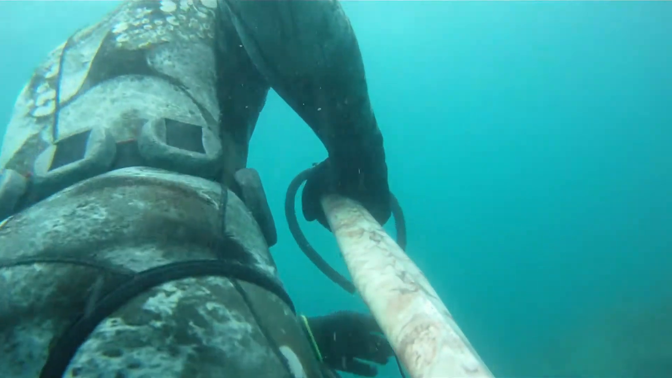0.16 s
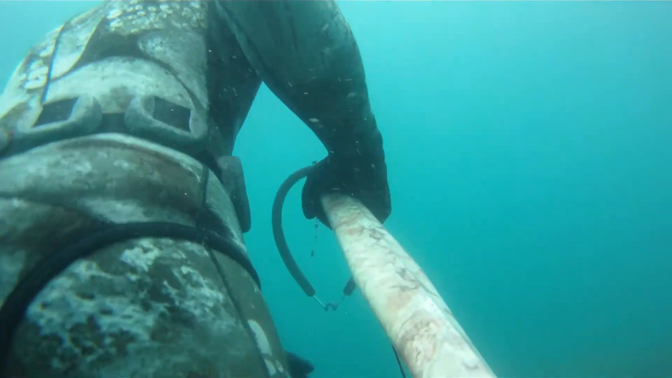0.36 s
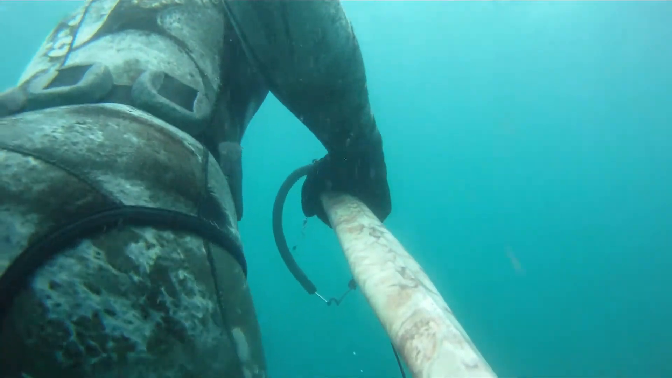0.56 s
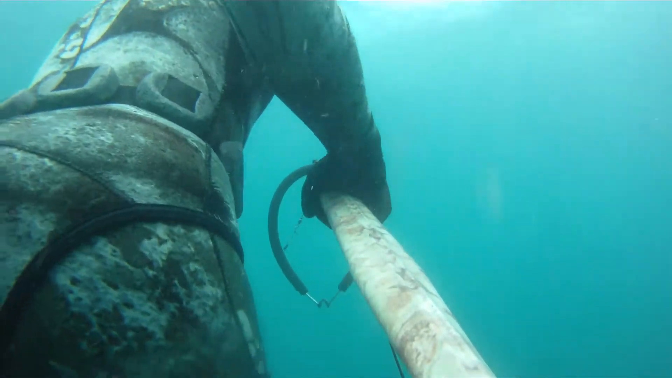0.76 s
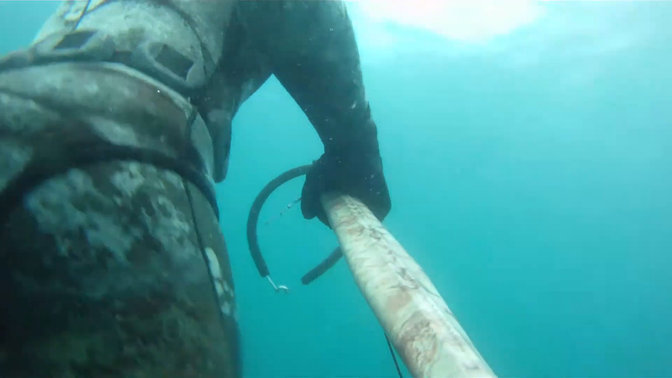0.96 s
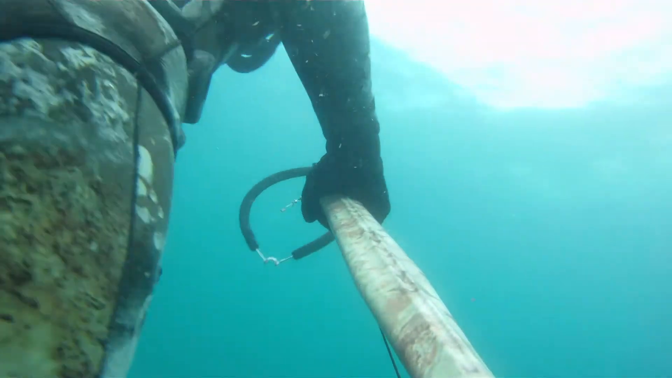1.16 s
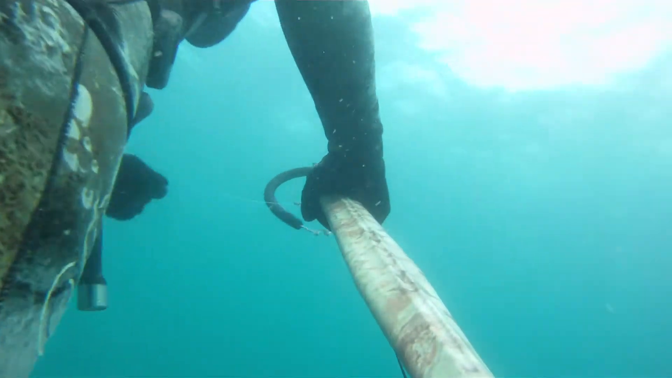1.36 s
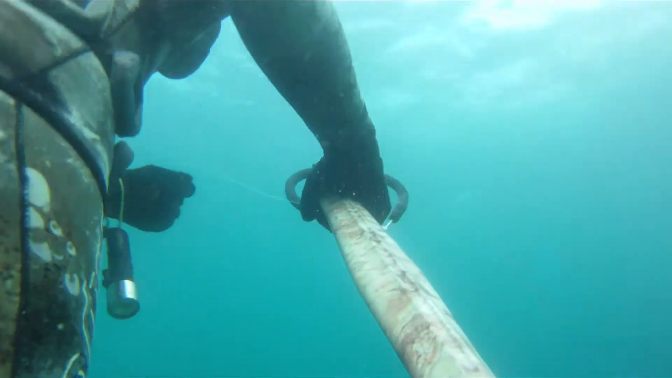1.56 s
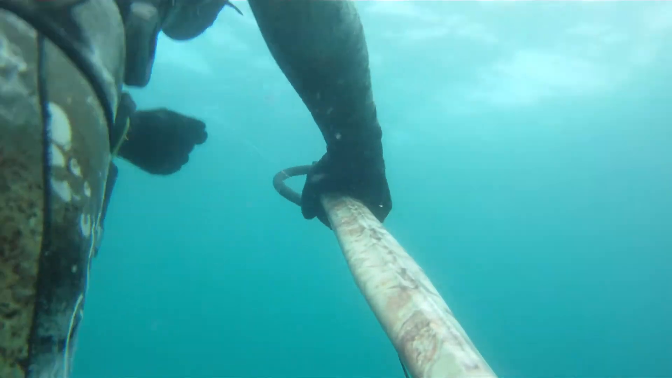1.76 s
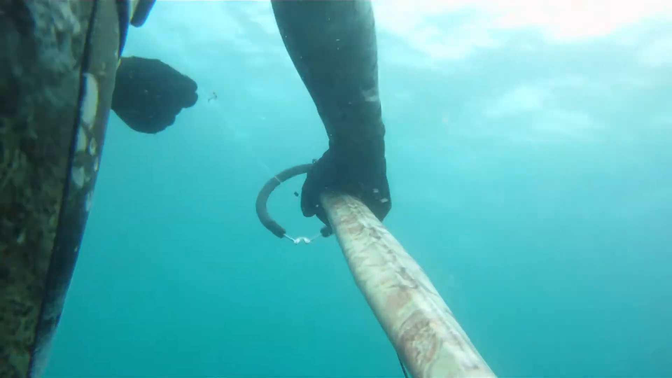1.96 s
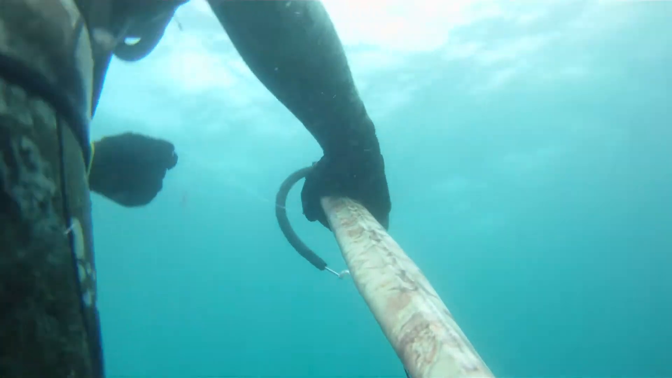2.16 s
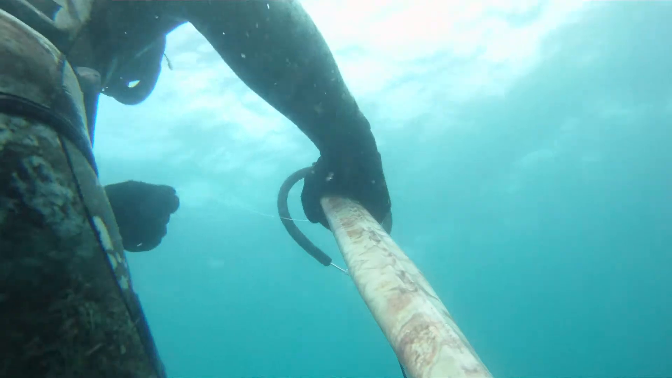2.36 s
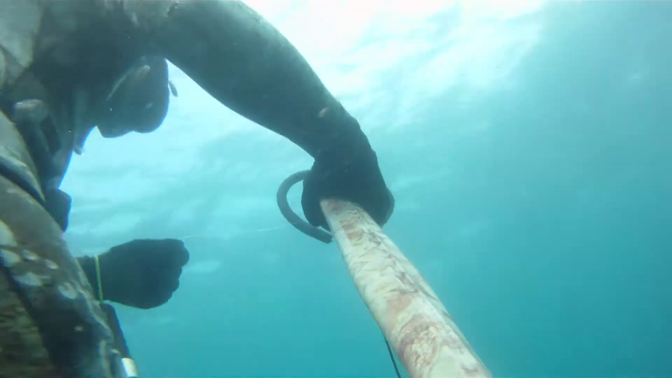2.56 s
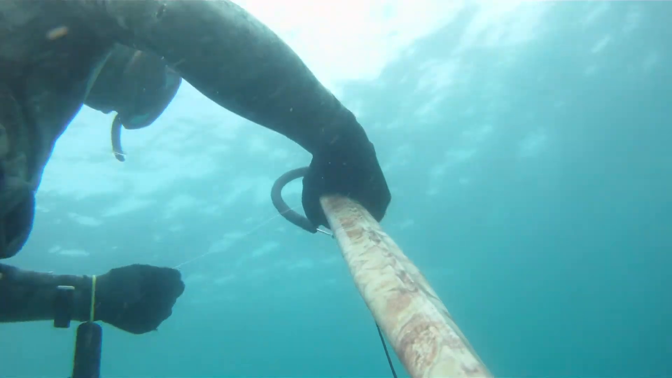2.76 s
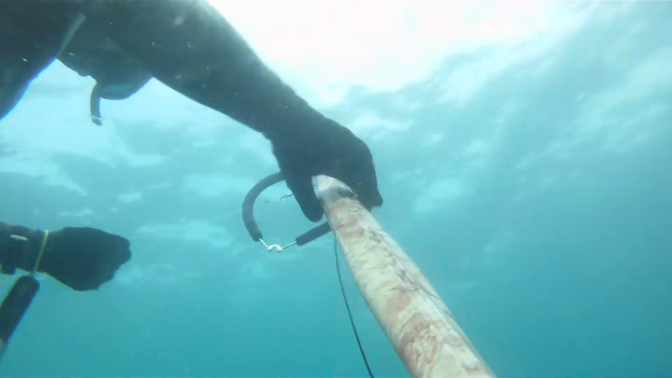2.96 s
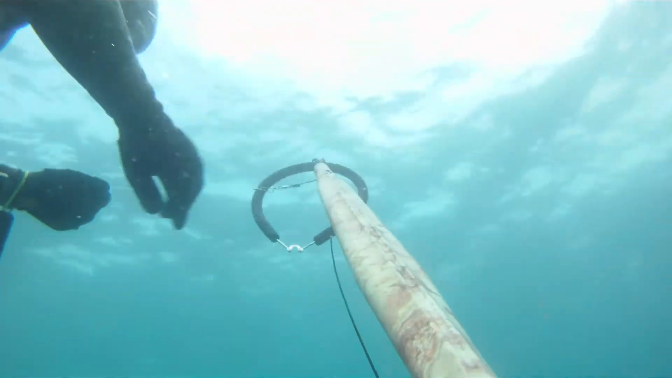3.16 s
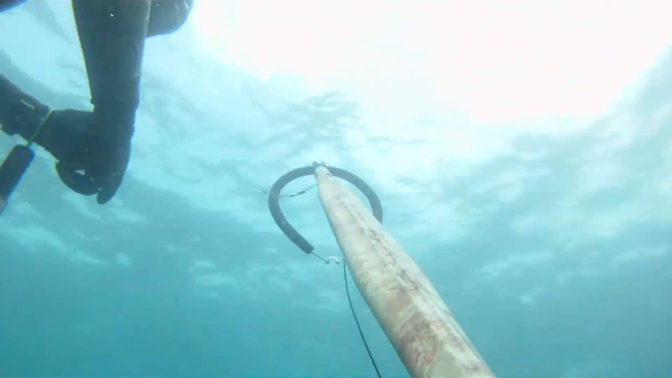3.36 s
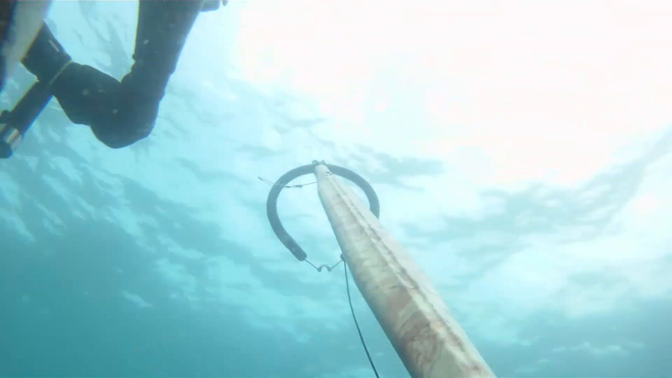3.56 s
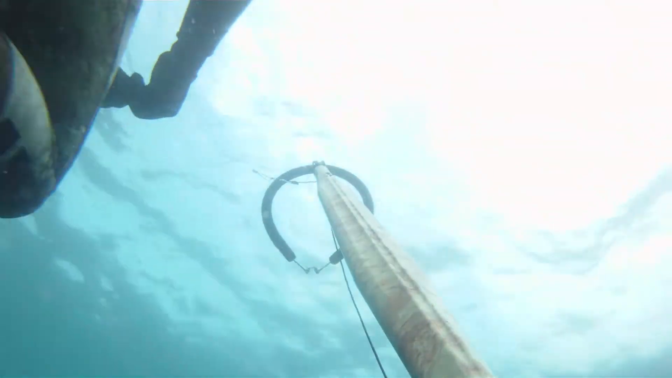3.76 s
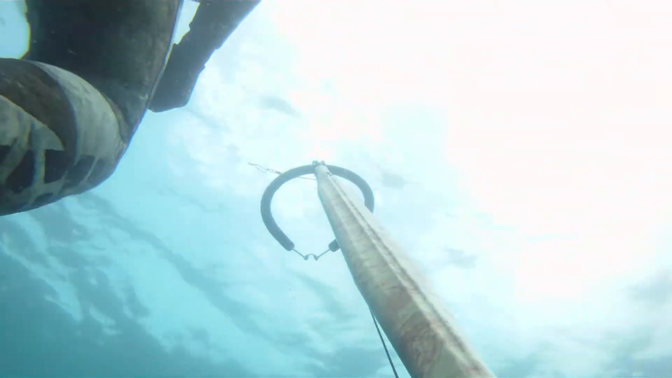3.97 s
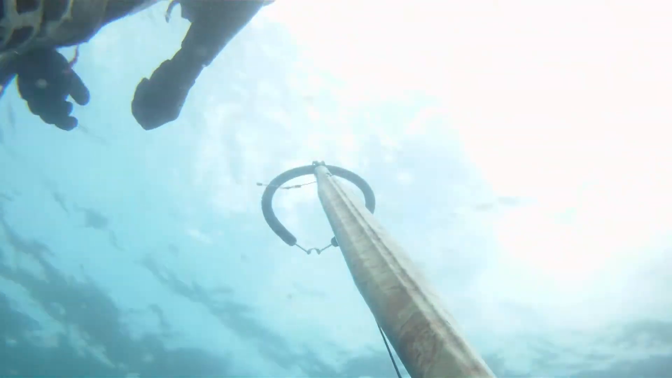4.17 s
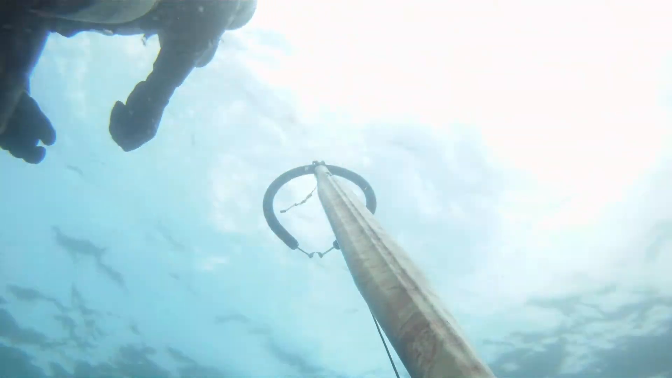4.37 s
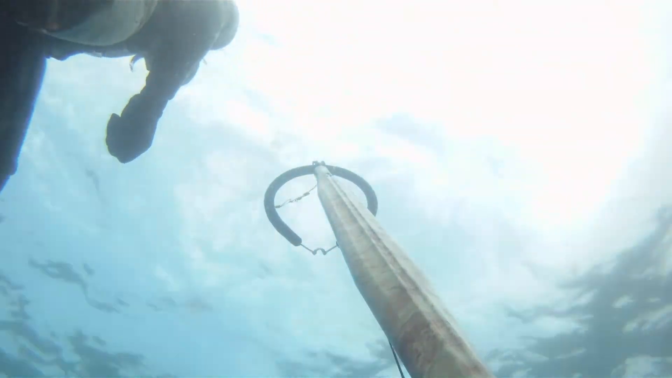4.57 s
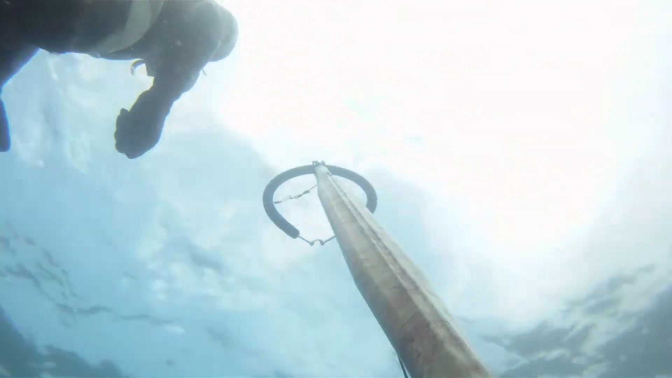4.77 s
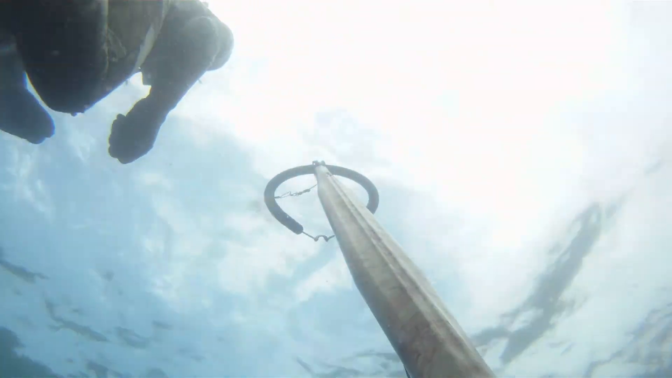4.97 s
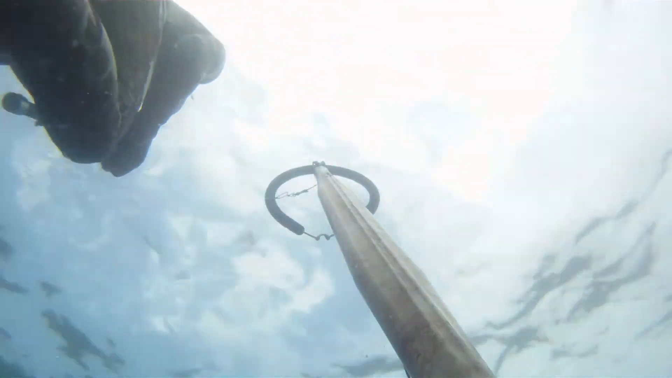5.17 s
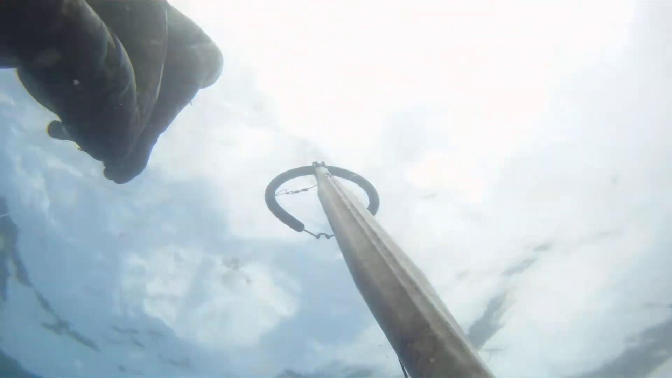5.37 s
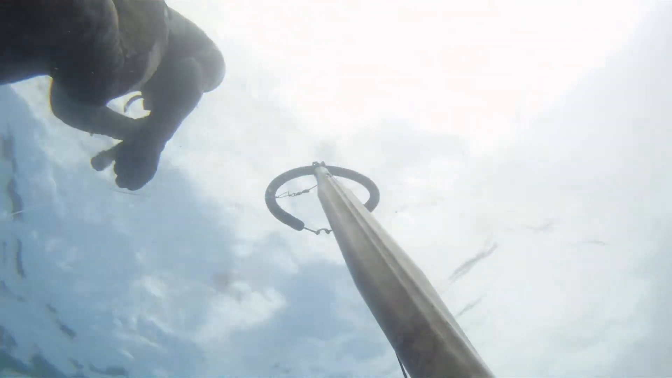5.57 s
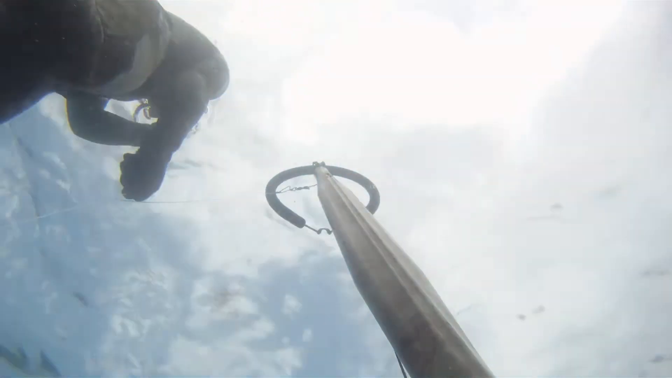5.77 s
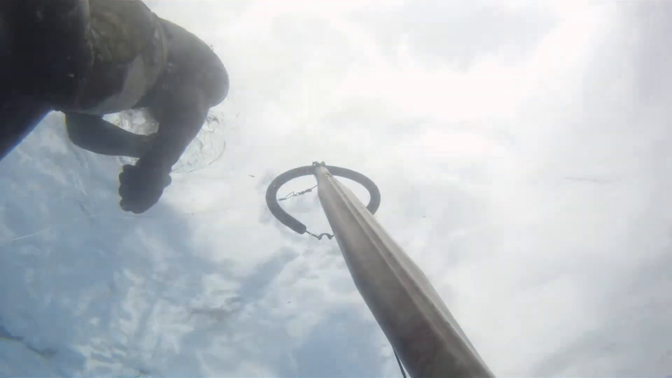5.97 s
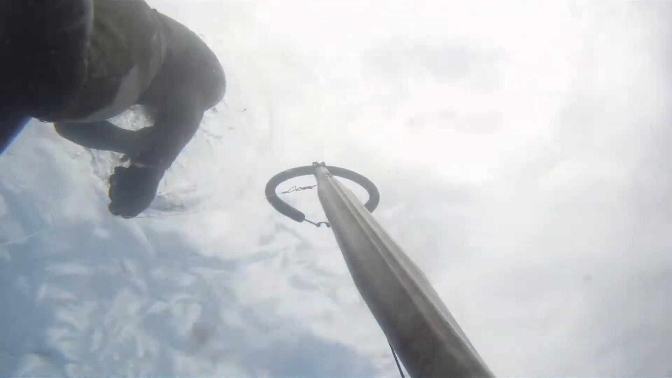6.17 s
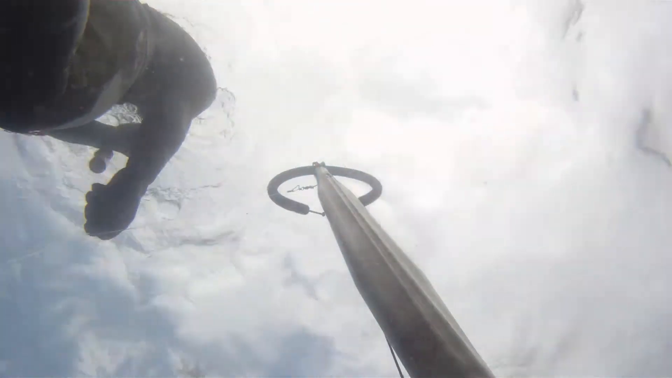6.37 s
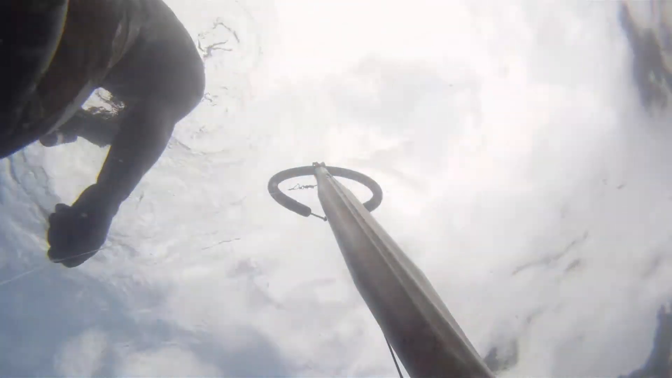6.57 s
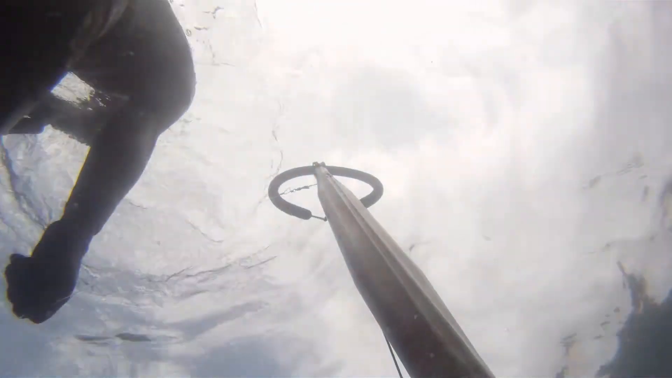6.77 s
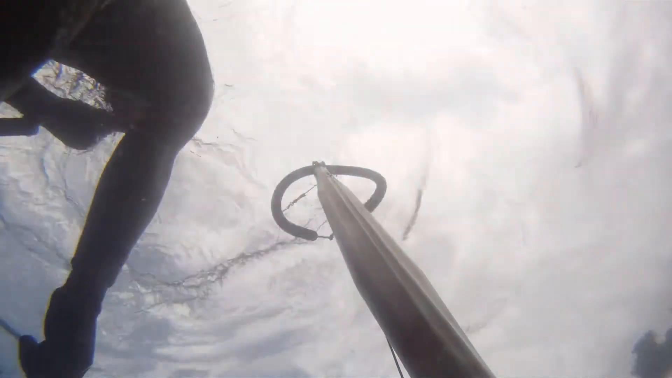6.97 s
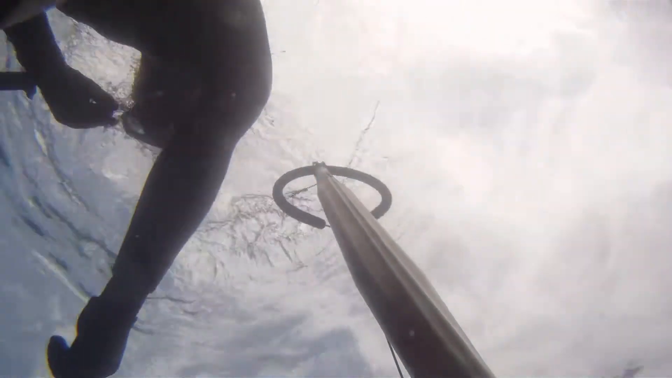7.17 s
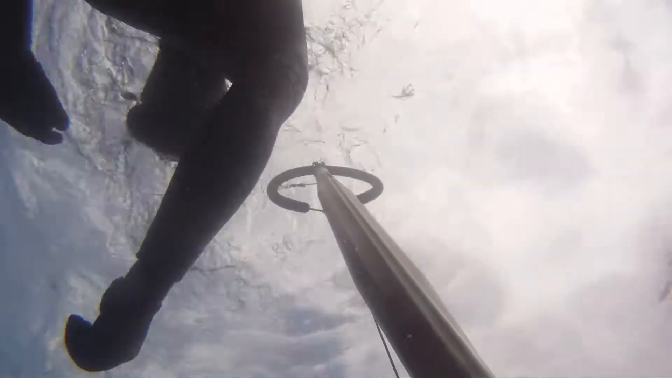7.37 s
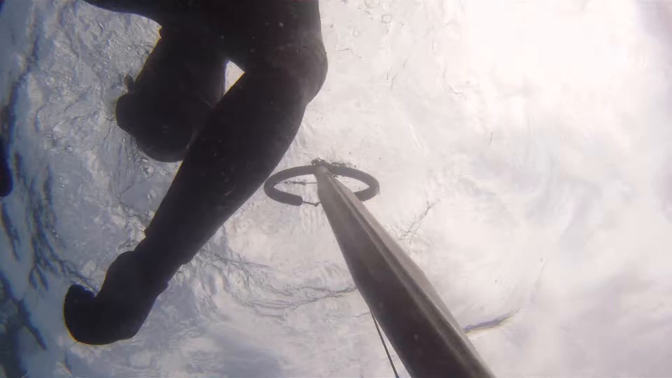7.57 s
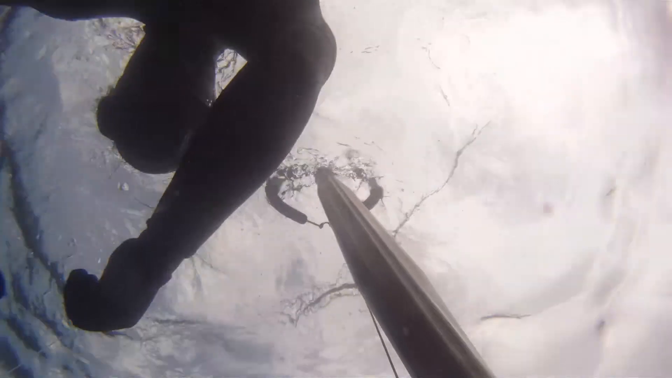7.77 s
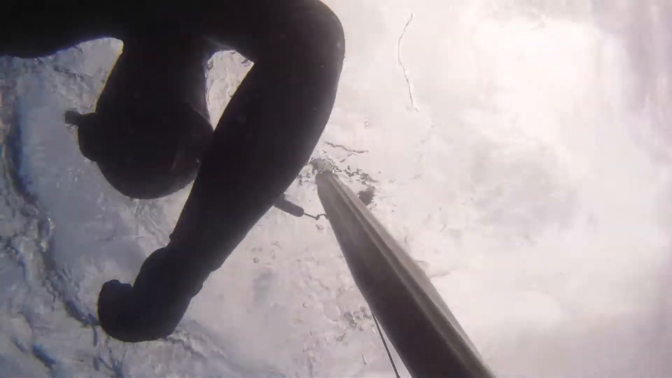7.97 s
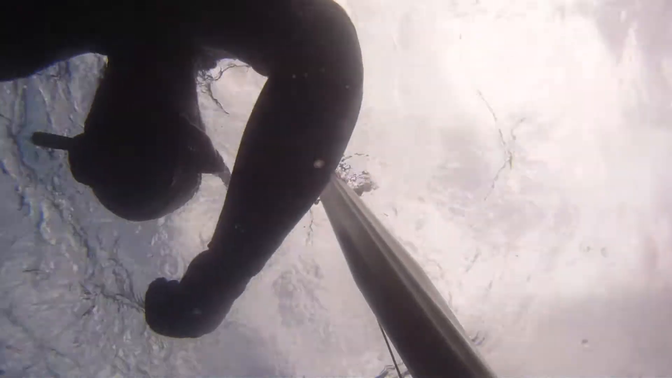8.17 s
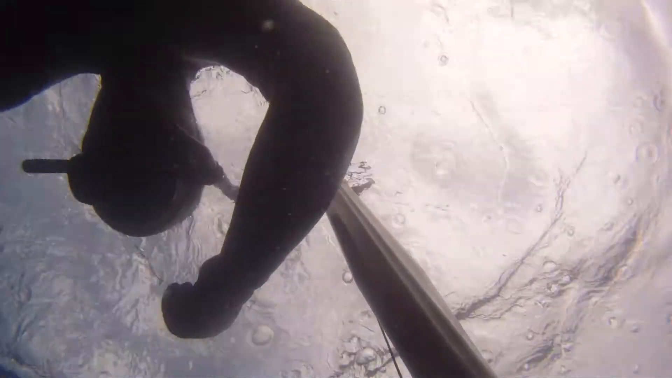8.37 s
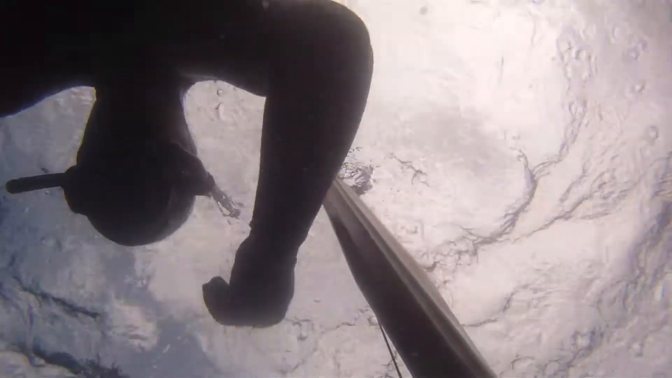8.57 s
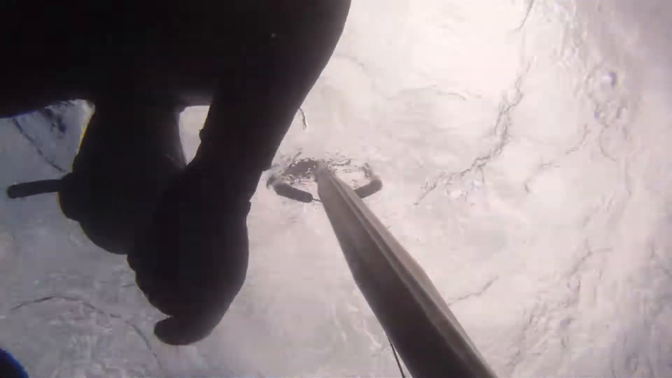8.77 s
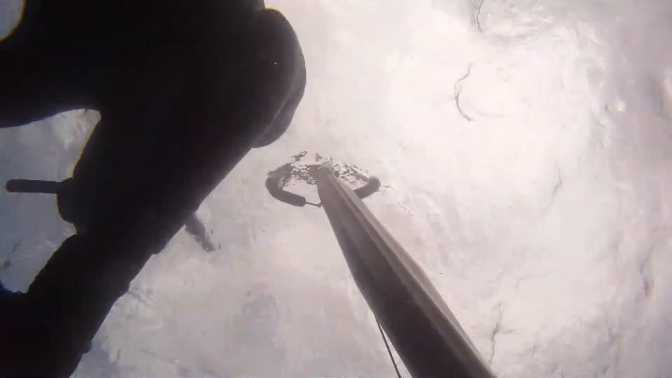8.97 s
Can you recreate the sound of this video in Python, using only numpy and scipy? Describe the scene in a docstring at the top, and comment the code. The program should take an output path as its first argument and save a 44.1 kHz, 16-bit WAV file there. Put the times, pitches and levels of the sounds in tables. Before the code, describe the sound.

A microphone in a sealed housing on a wooden barrel, underwater. Throughout, a faint hiss and clustered distant shrimp crackle, tinted around two kilohertz, with a gritty mirrored treble. Nearby shrimp give short dry clicks with scattered tails. From 0 to 1.5 s, low rumble, deep wobbling jolts, soft rubbing and a run of small hollow knocks. From 1.5 to 2.4 s it is calmer; at 2.4-3.3 s water pushes and rubbing swell again. A single wooden knock falls at 3.7 s. Between 4 and 7.5 s the clicks get stronger, notably at 5.4 and 6.7 s, with light knocks from 6.3 s and rumbling surges near 6.8 and 7.5 s. Around 8.0 s a barely audible thin squeak rises into by far the loudest event at 8.1 s: a bright crack, hollow thump and brief ringing. Lesser knocks follow at 8.3 and 8.5 s, then sparse clicks and hiss until 9 s.

```python
"""Under water, on a long wooden barrel that carries a microphone in a sealed housing.
Snapping shrimp crackle near and far: clicks and scattered noise, tinted by the housing's resonances.
Knocks on the wood are a bright crack, a hollow thump and ringing modes; jolts swing the lowest mode.
Water pushes and rumbles as shaped noise, and a hand and a line rub the barrel's modes awake.
The converter holds each sample, which mirrors all sound into the treble."""
import sys
import numpy as np
from scipy import signal
from scipy.fft import rfft, irfft, next_fast_len
from scipy.io import wavfile
from scipy.ndimage import uniform_filter1d

SR = 44100
rng = np.random.default_rng(int(sys.argv[2]) if len(sys.argv) > 2 else 0)


def wav_record(signal):
    """Record a signal, one row per channel, as 16-bit PCM in the file named by sys.argv[1]."""
    frames = np.transpose(np.atleast_2d(signal))
    bounded = np.clip(frames, -1, 1)
    # unit amplitude maps onto the largest positive 16-bit level
    quanta = np.round(bounded * 32767).astype(np.int16)
    wavfile.write(sys.argv[1], SR, quanta)


N = 398217

TREBLE_HZ = (2900, 5600)  # band of the sharp ticks in snaps and knocks

# Resonances of the sealed housing, for near and far shrimp.
# Each row: frequency in Hz, relative level in dB per Hz.
HOUSING_SPECTRUM = [(210, -52.5), (350, -8.5), (596, -3.5), (1200, -20.5), (1460, -5), (1770, -10),
                    (1970, -3.5), (2210, 2), (2550, -8), (2800, -7.5), (3040, -10.5), (3720, -8.5),
                    (4830, -23), (5240, -13.5), (5900, -31.5), (7670, -25), (13000, -120)]
# Snaps of single shrimp close by.
# Each row: start in seconds, click level in dB, ring in Hz, then low ring, treble tick and
# scattered tail, all three in dB relative to the click.
NEAR_SNAPS = [(0.0952, -39, 2300, -15, -4, -0.5), (0.1655, -39.5, 2100, -14, -13, -6),
              (0.3326, -27, 2120, -25, -24, -12.5), (0.5038, -30, 2200, -23, -14, -16),
              (0.626, -38, 1990, -13, -23, -14), (0.6868, -38, 2150, -11, -16, -8),
              (0.7572, -34.5, 2200, -2.5, -17, -12), (0.844, -42, 2250, -22, -1, -2),
              (0.9702, -33, 2050, -12, -16, -10.5), (1.0685, -45, 2200, -25, 3, 0),
              (1.2276, -41.5, 2300, -10, -12, -3.5), (1.291, -31, 2100, -12, -24, -21),
              (1.4157, -41, 2240, -14, 4, -9), (1.487, -33.5, 2230, -25, 1, -6),
              (1.6492, -33, 2260, -26, -23, -15), (1.8053, -37.5, 2220, -11, -6, -13),
              (1.9535, -41, 2230, -17, -19, -14), (2.0184, -40, 2150, -24, -15, 1),
              (2.1166, -42, 2200, -18, 3, -7), (2.3236, -41, 2200, -6, -2, -6),
              (2.7053, -35.5, 2160, -16, -10, -8), (2.7247, -36, 2110, -12, -20, -6),
              (2.7432, -34.5, 2240, -9, -21, -11), (2.7651, -38, 2050, -15, -14, -11),
              (2.8185, -45, 2120, -16, -17, -2.5), (2.9831, -28.5, 2230, -15, -10, -6.5),
              (3.0574, -35.5, 2160, -16, -18, -11), (3.2006, -43, 2170, -10, 6, -9),
              (3.2544, -43, 2130, -12, -13, 4), (3.3837, -30.5, 2170, -14, -21, -15),
              (3.4895, -36, 2110, -17, -14, -9), (3.6541, -33, 2450, -20, -18, -9),
              (3.6865, -35.5, 2100, -22, -19, -9.5), (3.7184, -35.5, 2220, -22, -3, -10.5),
              (3.897, -32.5, 2220, -12, -9, -3), (4.152, -28, 2150, -10, -11, -11.5),
              (4.3116, -27.5, 2240, -26, -29, -13.5), (4.4004, -29.5, 2270, -11, -5, -13),
              (4.4268, -36.5, 2080, -7, -26, -21), (4.5491, -28.5, 2180, -15, -3.5, -13),
              (4.6229, -45, 2260, -14, -12, -5), (4.6614, -47.5, 2400, -16, -7, -2),
              (4.7711, -35.5, 2300, -24, 11.5, -14.5), (4.8554, -42.5, 2100, -19, -17, -10),
              (4.995, -42.5, 2160, -20, -3, -1), (5.0614, -39, 2190, -18, -7, -10.5),
              (5.202, -47, 2260, -12, 2, -13), (5.247, -33, 2180, -11, -22, -11),
              (5.2808, -38.5, 2250, -15, -14, -14), (5.3457, -29, 2180, -10, -24, -10),
              (5.444, -23, 2270, -18, -25, -20.5), (5.473, -27, 2120, -8.5, -24, -20),
              (5.5313, -33.5, 2100, -21, 1, -14), (5.7079, -38.5, 2260, -13, -2, -1),
              (5.9803, -27.5, 2400, -20, -20, -16), (6.0232, -36.5, 2400, -25, -20, -19),
              (6.103, -28.5, 2160, -13, -23, -17), (6.2223, -35.5, 2290, -18, -17, -6.5),
              (6.3859, -42, 2370, -16, -11, -8), (6.4617, -38, 2320, -15, -14, -10),
              (6.4877, -30, 2230, -26, -22, -15.5), (6.5819, -37, 2300, -28, -23, -28),
              (6.6638, -31.5, 2170, -9, -24, -10.5), (6.7156, -21, 2270, -6, -21, -19.5),
              (6.791, -26, 2350, -27, -15, -15.5), (6.8004, -46, 2190, -14, -10, -2),
              (6.8129, -32, 2080, -15, -16, -5.5), (6.8748, -35, 2220, -25, -23, -27),
              (7.0289, -39.5, 2270, -17, -20, -7), (7.0519, -34.5, 2220, -17, -20, -15),
              (7.1302, -29.5, 2280, -25, -9, -15), (7.1975, -38.5, 2020, -6, -17, -6),
              (7.4734, -29.5, 2260, -22, -22, -7.5), (7.5024, -35.5, 2100, -18, -14, -4.5),
              (7.6036, -34, 2300, -19, -10, -13.5), (8.5435, -38, 2080, -20, -8, -13),
              (8.7206, -38, 2220, -14, 2, -4.5), (8.771, -32.5, 1940, -9, -19, -16),
              (8.7889, -34, 2000, -24, -23, -12), (8.8583, -35, 2220, -19, -18, -15),
              (8.978, -41, 2160, -20, -16, -10)]


def near_snaps(tail_t60=0.11, rise=.0007, low_hz=1520, treble_t60=0.007):
    """A click rings the housing, a bounce follows within milliseconds, then a lumpy scattered tail."""
    click_ms, bounce_ms, bounce_db = .6, 2.427, -11.5  # delays count from the start of the snap
    tails, rings = np.zeros(N), np.zeros(N)
    t = np.arange(4096) / SR
    noises = rng.standard_normal((len(NEAR_SNAPS), len(t)))
    for (s, db, hz, low_db, treble_db, tail_db), noise in zip(NEAR_SNAPS, noises):
        tick = evened(band(band(noise, *TREBLE_HZ), *TREBLE_HZ)) * np.minimum(t / rise, 1)
        tick = gain_of(treble_db - 60 * t / treble_t60) * tick
        low_ring = gain_of(low_db) * ping(low_hz, 2.04 * rise, t)
        click = ping(hz, rise, t) + low_ring + tick
        add(rings, s + click_ms / 1000, gain_of(db) * click)
        add(rings, s + bounce_ms / 1000, gain_of(db + bounce_db) * click)
        # slow random level swings, 4.4 dB rms, make the tail lumpy
        lumps = gain_of(4.4 * evened(uniform_filter1d(noise[::-1], 130)))
        add(tails, s, gain_of(db + tail_db - 60 * t / tail_t60) * noise * lumps)
    return coloured(band(tails, 1150, 7000), HOUSING_SPECTRUM) + rings


# Bending modes of the wooden barrel.
# Each row: frequency in Hz, level in dB before hardness tilts it, 60 dB decay time in seconds.
BARREL_MODES = [(304, -5, .17), (581, -12, .14), (716, -12, .07), (991, -6, .1), (1066, -20, .22),
                (1351, -14, .12), (1488, -16, .15), (1669, -11, .26), (2049, 0, .13), (2322, -6, .13),
                (2695, -20, .2), (3327, -22, .13), (3569, -20, .13)]
# Knocks on the barrel.
# Each row: time in seconds, thump level in dB, thump pitch in Hz, crack level in dB relative to
# the thump, hardness in dB per octave (the tilt of the modes above 1 kHz).
BARREL_KNOCKS = [(.026, -32.5, 650, -32, -4), (.039, -34, 664, -19, -1), (.081, -45, 640, -15, -7),
                 (0.357, -43, 454, 0, -12), (.431, -50, 670, 0, -5), (.454, -35.5, 634, -10.5, -13),
                 (.548, -47.5, 680, -8, -5), (.694, -45, 653, -9, 1), (0.988, -39, 703, -8, -8),
                 (1.272, -45.5, 444, -2, -10), (1.43, -45.5, 500, -15, -6), (3.665, -31.5, 665, -16, 2),
                 (6.258, -37.5, 610, -11, 6), (6.7197, -38, 579, -11, -4), (7.19, -42, 566, -10, 3),
                 (7.642, -43.5, 590, -6, 4), (7.874, -41.5, 550, -28.5, -5), (7.997, -47.5, 606, -14, -4),
                 (8.086, -6.5, 632, -3, 2), (8.317, -17, 641, -5.5, -11), (8.433, -33, 627, -14, -18),
                 (8.459, -40, 598, -20, 0), (8.493, -17.5, 624, -4, -11.5), (8.658, -49.5, 660, -19, -14)]


def knocks(rise=0.0014):
    """Bending waves in wood disperse: the bright crack comes first, the hollow thump after, modes ring."""
    lead_s, thump_after_s = .005, .0037  # crack before the listed time; thump after the crack
    crack_hz, crack_hz_per_db, ring_db = 1772, 27, -15.5  # a harder knock cracks higher
    out, t = np.zeros(N), np.arange(SR // 4) / SR
    hz, db, t60 = np.transpose(BARREL_MODES)[:, :, None]
    late = np.maximum(t - 0.0954 / np.sqrt(hz), 0)  # low modes arrive later
    attack = 1 - np.exp(-late * hz / 3)
    modes = gain_of(db - 60 * late / t60) * np.sin(2 * np.pi * hz * late) * attack
    noises = rng.standard_normal((len(BARREL_KNOCKS), len(t)))
    for (s, peak_db, thump_hz, crack_db, hard_db), noise in zip(BARREL_KNOCKS, noises):
        grit = gain_of(-14 - 60 * t / 0.083) * evened(band(noise, 900, 1900))
        treble = evened(band(noise[::-1], *TREBLE_HZ))
        grit = grit + gain_of(2 * hard_db - 52 - 60 * t / 0.017) * treble
        crack = ping(crack_hz + crack_hz_per_db * hard_db, rise, t)
        crack = crack + .5 * ping(1665, 1.9 * rise, t) + .4 * ping(1836, 1.4 * rise, t) + grit
        tilt = gain_of(hard_db * np.maximum(np.log2(hz / 1000), 0))
        ring = (tilt * modes).sum(0)
        add(out, s - lead_s, gain_of(peak_db) * (gain_of(crack_db) * crack + gain_of(ring_db) * ring))
        add(out, s - lead_s + thump_after_s, gain_of(peak_db) * thump(thump_hz))
        rattle = evened(band(noise, 420, 530))  # rough after-rattle
        add(out, s, gain_of(peak_db - 12.5 - 60 * t / 0.043) * rattle)
    return out


def thump(hz, length=.012, skew=.65, edge=1.3):
    """A train of cycles with a close upper partner that rises fast, sags and stops short."""
    t = np.arange(0, length, 1 / SR)
    turns = hz * (t - length / 3)  # the two fall into step near the crest
    pair = np.sin(2 * np.pi * turns) + 0.17 * np.sin(2 * np.pi * 1.35 * turns)
    return np.sin(np.pi * (t / length) ** skew) ** edge * pair


# Jolts that set the lowest bending mode swinging.
# Each row: crest in seconds (a swell cut by the start of the scene crests later), pitch in Hz,
# rms level at the crest in dB.
BARREL_JOLTS = [(.03, 59, -41), (0.201, 58, -39.5), (.37, 56, -43), (.55, 58.8, -31), (0.849, 59.9, -36),
                (1.56, 58.3, -61), (2.772, 61, -44), (3.018, 63.6, -46), (3.22, 64, -48), (4.02, 58, -52),
                (5.612, 59, -54), (5.93, 67.5, -47), (6.111, 56.5, -44), (6.3, 55, -54), (6.45, 54.3, -51),
                (6.62, 62.4, -45.5), (6.99, 59.4, -36), (7.22, 60.3, -43.5), (7.35, 63.3, -50),
                (7.502, 72.2, -36.5), (7.56, 41.6, -38), (8.169, 59.4, -26), (8.369, 61.1, -37.5),
                (8.549, 63.6, -43.5)]


def sway():
    """The lowest mode swells with each jolt and dies away; the flow keeps it faintly stirring."""
    rise_s, t60 = 0.0678, 0.5
    out, t = np.zeros(N), np.arange(SR // 2) / SR
    swell = np.sin(np.pi / 2 * np.minimum(t / rise_s, 1)) ** 2
    shape = swell * gain_of(-60 * np.maximum(t - rise_s, 0) / t60)
    for s, hz, db in BARREL_JOLTS:
        add(out, s - rise_s, np.sqrt(2) * gain_of(db) * shape * np.sin(2 * np.pi * hz * t))
    idle = shaken(rng.standard_normal(N), [(59, 21, -2.5)])  # centre Hz, width Hz, dB against the flow
    return out + flow_gain() * idle


# A faint thin tone rising into the loudest knock.
# Each row: time in seconds, pitch in Hz, rms level in dB.
LINGERING_GLIDE = [(7.995, 943, -58), (8.078, 1043, -64.5)]


def lingering_tone():
    """A gliding sine makes one faint lingering tone."""
    return tone(LINGERING_GLIDE)


# Barrel modes that rubbing wakes.
# Each row: frequency in Hz, width in Hz, relative level in dB.
RUBBED_MODES = [(303, 14.5, 1.5), (429, 31, -10), (683, 97, 3), (1370, 350, -6.5)]
# Hand and line rubbing along the barrel.
# Each row: start in seconds, length in seconds, stroke strength in dB before firmness scales it.
RUB_STROKES = [(0, 0.096, -54), (0.196, 0.71, -59.5), (0.423, 0.095, -51), (1.506, 0.24, -65),
               (2.403, 0.55, -59.5), (2.802, 0.23, -55), (6.75, 0.19, -61.5), (7.46, 0.11, -60.5),
               (8.069, 0.079, -48.5), (8.296, .1, -58), (8.457, 0.079, -60)]


def rubbing(slips_per_s=90, drag_db=-70.5, firm_db=-54, firm_slope=0.36):
    """Small random slips and steady friction noise ring the modes; a faint drag goes on between strokes."""
    friction, slips = rng.standard_normal((2, N))
    slips = evened(slips * (rng.random(N) < slips_per_s / SR))
    rub_db = strokes(RUB_STROKES, drag_db)
    firm = gain_of(firm_slope * (rub_db - firm_db))  # faint contact hardly excites the wood
    return gain_of(rub_db) * firm * shaken(0.58 * friction + slips, RUBBED_MODES)


# Rumble of the turbulent flow.
# Each row: frequency in Hz, relative level in dB per Hz.
FLOW_SPECTRUM = [(20, -17.5), (70, 1.5), (140, -5.5), (260, -14.5), (500, -30), (1000, -53)]
# Low modes that the flow shakes.
# Each row: frequency in Hz, width in Hz, level in dB relative to the rumble.
FLOW_SHAKEN_MODES = [(98.2, 30, -8), (176.9, 15, -13)]
# Surges of turbulent water.
# Each row: start in seconds, length in seconds, crest level in dB.
WATER_SURGES = [(0, 0.099, -42), (.05, 0.9, -49), (.38, 0.19, -42.5), (1.3, 0.58, -53.5),
                (1.41, 0.069, -46), (2.38, 0.39, -53), (2.68, 0.095, -48), (2.8, 0.26, -44.5),
                (3.9, 0.27, -55.5), (3.0, .2, -46.5), (4.66, .05, -48), (4.95, 0.23, -59),
                (5.86, 0.12, -54.5), (6.74, 0.24, -45), (7.2, .2, -55), (7.45, 0.15, -44.5),
                (7.65, 0.29, -61), (8.07, 0.12, -39.5), (8.2, 0.42, -48)]


def turbulence(lumpy_db=2.2):
    """Lumpy eddies rumble as shaped noise and shake low modes, swelling with each surge."""
    rumble, shake, gusts = rng.standard_normal((3, N))
    eddies = gain_of(lumpy_db * evened(band(gusts, 3, 14)))
    flow = evened(coloured(rumble * eddies, FLOW_SPECTRUM, size=32768))
    flow = flow + shaken(shake * eddies, FLOW_SHAKEN_MODES)
    return flow_gain() * flow


def flow_gain(calm_db=-58.5):
    """The strength of the flow: surges over a calm rest."""
    return gain_of(strokes(WATER_SURGES, calm_db))


# Slow water pressure on the housing.
# Each row: time in seconds, level in dB.
PRESSURE_LEVELS = [(0, -44), (.2, -43), (.98, -48.5), (1.6, -56), (1.76, -39.5), (2.0, -54.5), (2.36, -48),
                   (2.5, -38), (3.14, -36.5), (3.42, -43), (3.9, -53), (5.4, -59), (6.0, -60), (6.75, -58),
                   (6.9, -42), (7.55, -44.5), (7.8, -52.5), (8.52, -45), (9.03, -61.5)]


def pressure():
    """Slow pressure pushes on the housing: noise between 7 and 24 Hz that follows a level curve."""
    push = band(band(rng.standard_normal(N), 7, 24), 7, 24)
    return gain_of(curve(PRESSURE_LEVELS, 1)) * evened(push)


# Distant shrimp crackle.
# Each row: time in seconds, level in dB of the hiss and crackle together.
FAR_LEVELS = [(0.0, -50.5), (1.28, -54), (2.11, -51), (2.59, -52.5), (2.81, -52), (7.57, -51.5),
              (7.82, -52.5), (8.57, -51), (9.03, -55)]


def far_snaps(per_s=220, spread_db=9.0, hiss_db=-4.5, crackle_db=-10.0, count=8):
    """Clustered small snaps, tinted and smeared by their paths, over the hiss of those too far to tell apart."""
    head_t60, tail_t60, tail_db, path_span = .008, .09, -11, 1.45  # s, s, dB, pitch ratio
    busy = gain_of(6 * evened(band(rng.standard_normal(N), 4.4, 20)))  # clusters come and go
    sizes = gain_of(spread_db * np.minimum(rng.exponential(1, N), 3))
    snaps = sizes * (rng.random(N) < busy * per_s / SR)
    path, t = rng.integers(0, count, N), np.arange(4096) / SR
    decay = gain_of(-60 * t / head_t60) + gain_of(tail_db - 60 * t / tail_t60)
    smears = rng.standard_normal((count, len(t))) * decay
    crackle = np.zeros(N)
    for k, hz in enumerate(np.geomspace(1400, 4500, count)):
        smear = evened(band(smears[k], hz / path_span, hz * path_span))
        crackle += signal.oaconvolve(snaps * (path == k), smear)[:N]
    drive = gain_of(hiss_db) * rng.standard_normal(N) + gain_of(crackle_db) * evened(crackle)
    return gain_of(curve(FAR_LEVELS, 1)) * coloured(drive, HOUSING_SPECTRUM)


def gain_of(db):
    """Decibels as a factor."""
    return 10 ** (np.asarray(db) / 20)


def evened(x):
    """Scaled to rms 1."""
    return x / np.sqrt(np.mean(x ** 2) + 1e-20)


def curve(rows, column):
    """One column of a table, at every sample."""
    rows = np.array(rows)
    return np.interp(np.arange(N) / SR, rows[:, 0], rows[:, column])


def add(mix, s, sound):
    """Mixes a sound in at second s."""
    part = mix[max(round(s * SR), 0):][:len(sound)]
    part += sound[:len(part)]


def coloured(x, points, size=8192):
    """Causal filter that follows a spectrum: phase from the Hilbert transform of the log gain."""
    hz, db = np.transpose(points)
    at = abs(np.fft.fftfreq(size, 1 / SR))
    level_db = np.interp(np.log(at + 1), np.log(hz + 1), db)
    log_gain = np.log(gain_of(np.maximum(level_db, -70)))
    taps = np.fft.ifft(np.exp(np.conj(signal.hilbert(log_gain)))).real[:size // 2]
    return signal.oaconvolve(x, taps / np.linalg.norm(taps))[:len(x)]


def band(x, low_hz, high_hz):
    """Band-pass."""
    return signal.sosfilt(signal.butter(2, [low_hz, high_hz], "band", fs=SR, output="sos"), x)


def ping(hz, rise, t):
    """A few cycles whose envelope swells for rise seconds to height 1 and dies away."""
    return t / rise * np.exp(1 - t / rise) * np.sin(2 * np.pi * hz * t)


def tone(rows):
    """A sine that follows rows of time, pitch and level, silent outside them."""
    t = np.arange(N) / SR
    sounding = uniform_filter1d(1. * (t >= rows[0][0]) * (t <= rows[-1][0]), size=300)  # soft edges
    sine = np.sin(2 * np.pi * np.cumsum(curve(rows, 1)) / SR)
    return np.sqrt(2) * sounding * gain_of(curve(rows, 2)) * sine


def shaken(x, modes):
    """The modes, as bands of x at their own levels."""
    return sum(gain_of(db) * evened(band(x, hz - width / 2, hz + width / 2)) for hz, width, db in modes)


def strokes(rows, rest_db, skew=0.72):
    """Level in dB of strokes that swell and fade over a steady rest; skew under 1 crests early."""
    power = np.full(N, gain_of(2 * rest_db))
    for start, length, db in rows:
        progress = np.arange(0, length, 1 / SR) / length
        add(power, start, gain_of(2 * db) * np.sin(np.pi * progress ** skew))
    return 10 * np.log10(power)


def scene():
    """All sources at the one microphone."""
    barrel = knocks() + sway() + lingering_tone() + rubbing()
    water = turbulence() + pressure()
    return (near_snaps() + barrel + water + far_snaps())[None]


def record(dry):
    """Sampling at a low rate and holding each value mirrors the sound around that rate under a sinc slope."""
    hold_hz, guard_hz, roll_hz, edge_hz = 12000, 450, 15300, 16500
    size = next_fast_len(N)
    hz = np.fft.rfftfreq(size, 1 / SR)
    guard = np.clip((hold_hz / 2 - hz) / guard_hz, 0, 1)  # the input filter closes below half the rate
    # lifted ahead of the hold, so that its sinc slope leaves the sound below half the rate level
    kept = irfft(rfft(dry, size) * guard / np.sinc(np.minimum(hz / hold_hz, .5)), size)
    sampled = kept * (1 + 2 * np.cos(2 * np.pi * hold_hz * np.arange(size) / SR))
    roll = gain_of(-.022 * np.maximum(hz - roll_hz, 0) - 8 * (hz > roll_hz))
    held = irfft(rfft(sampled) * np.sinc(hz / hold_hz) * roll, size)[:, :N]
    held = held + gain_of(-72) * rng.standard_normal(N)  # circuit hiss
    low_pass = signal.firwin(511, edge_hz, window=("kaiser", 9), fs=SR)
    return signal.oaconvolve(held, low_pass[None], "same")


dry = scene()
out = record(dry)
wav_record(out)
```